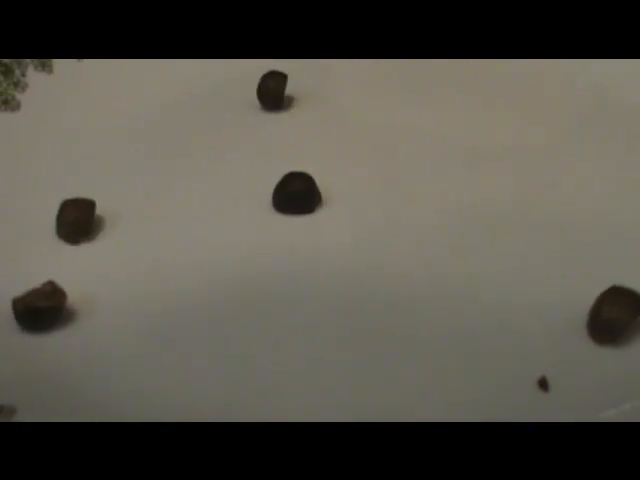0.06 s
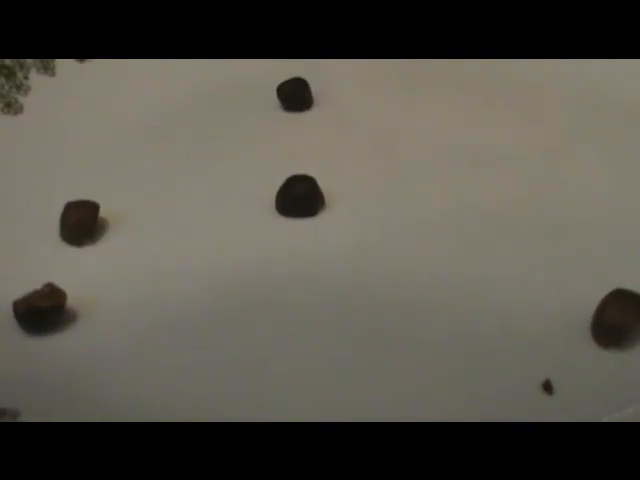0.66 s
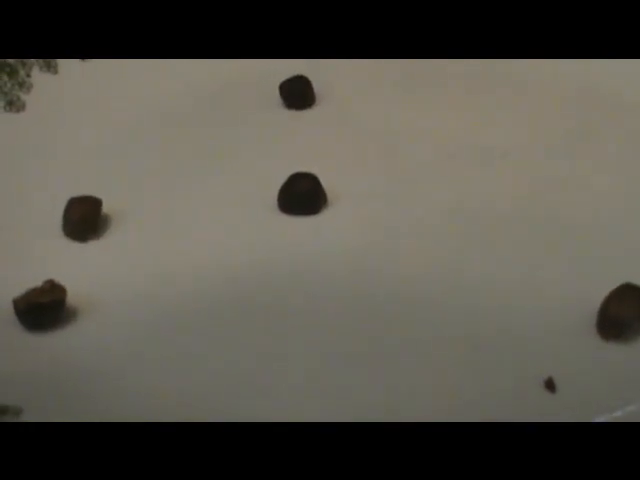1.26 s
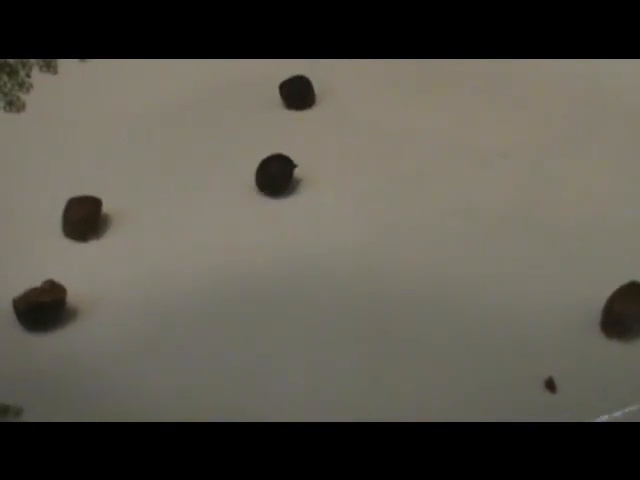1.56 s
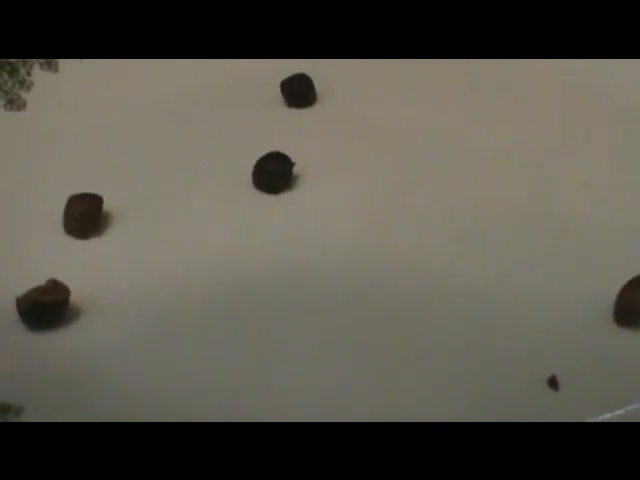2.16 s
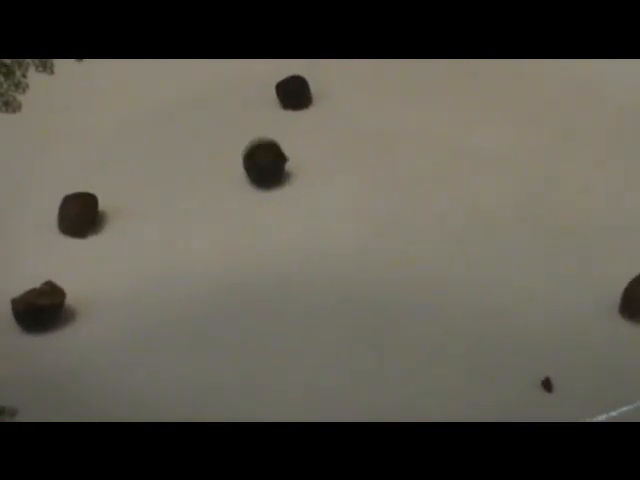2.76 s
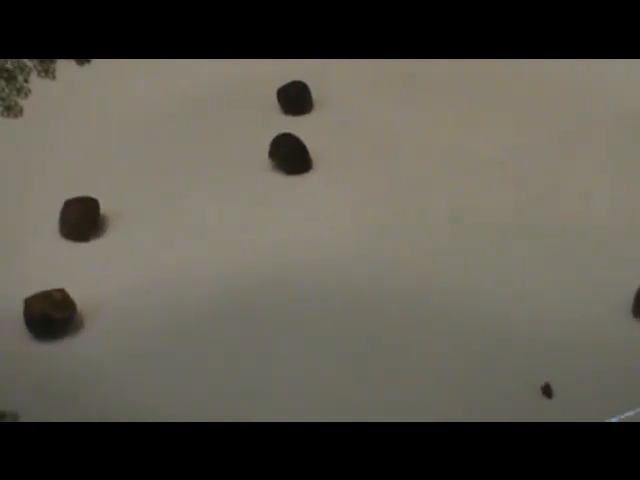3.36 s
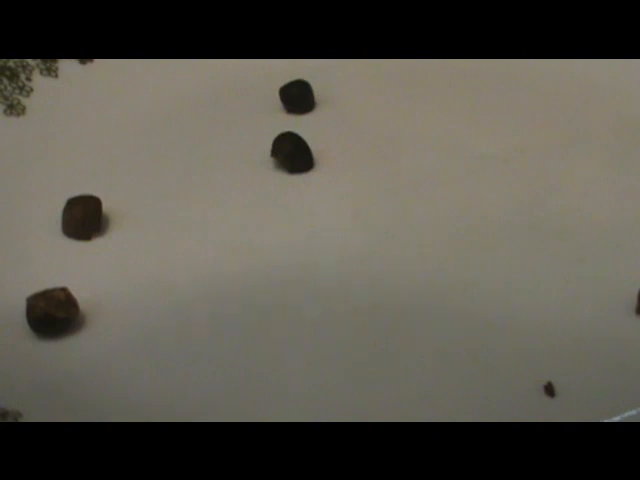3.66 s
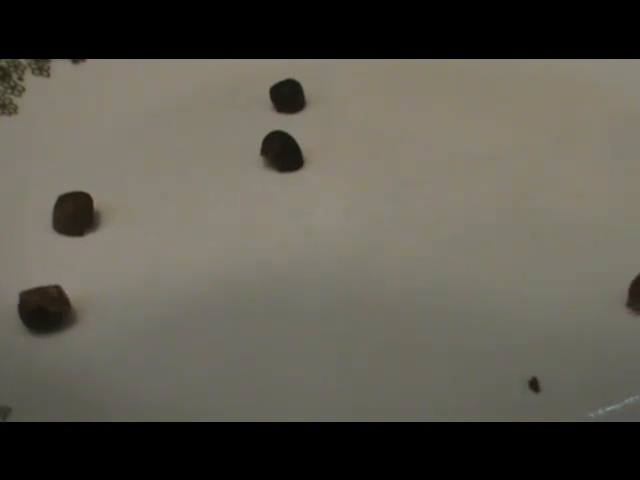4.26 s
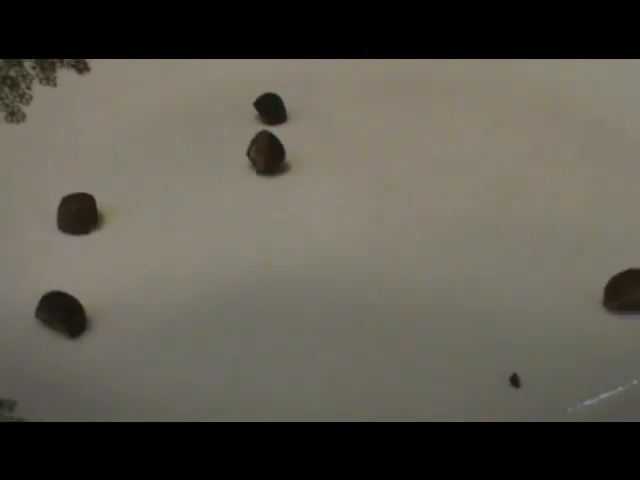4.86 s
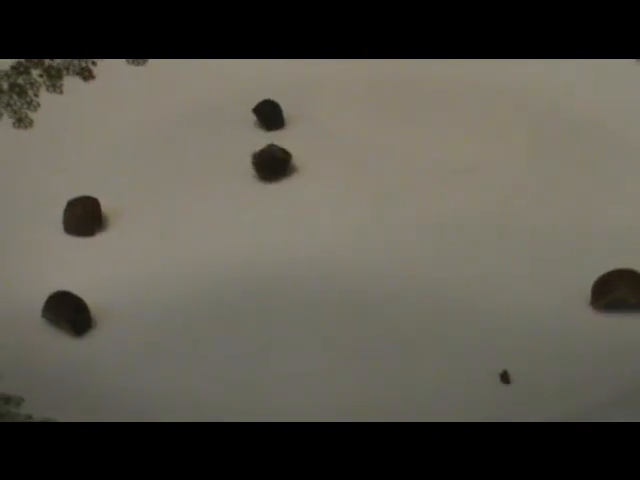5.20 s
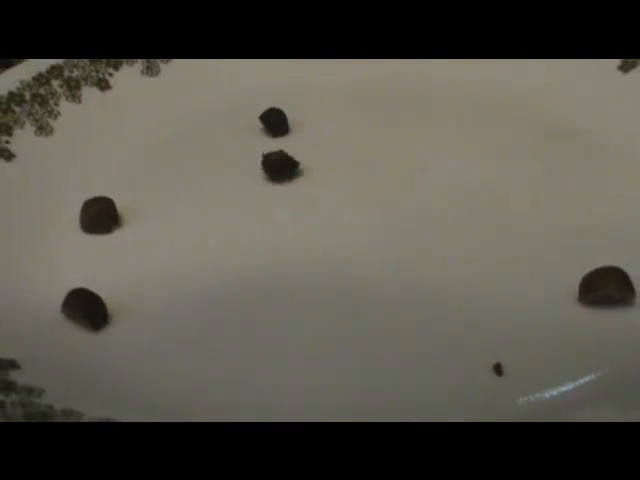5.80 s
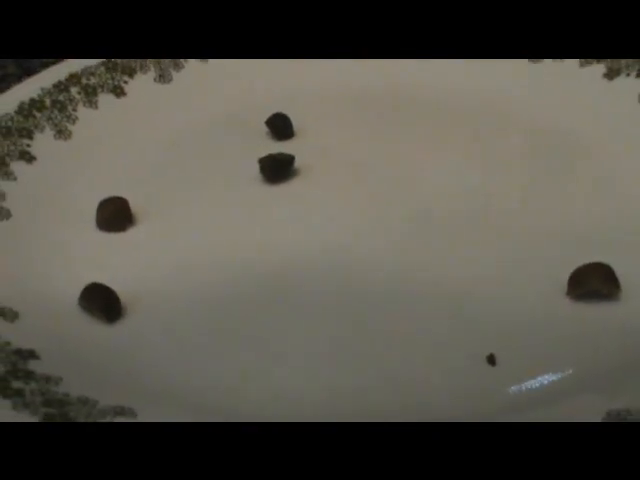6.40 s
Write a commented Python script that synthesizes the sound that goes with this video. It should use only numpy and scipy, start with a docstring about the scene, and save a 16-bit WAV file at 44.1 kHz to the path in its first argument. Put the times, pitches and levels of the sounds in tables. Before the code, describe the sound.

Small hard beans twitch on a ceramic dish, making sharp, irregular clicks and light rocking ticks in a quiet room.

```python
"""Jumping beans twitch on a ceramic dish, close by, over a quiet room's rumble and hiss.
First a small bean flips and wobbles. Then shells scuff, beans jerk, a heavy one tumbles, and the
table gets two soft bumps. Near 4.7 seconds one bean leaps, lands hard and rocks itself to rest,
while a bean briefly slides. Every touch rings the same tones of the dish, in a mix set by the
spot that is touched."""
import sys
import numpy as np
from scipy import signal
from scipy.fft import rfft, irfft
from scipy.io import wavfile

SR = 44100
rng = np.random.default_rng(int(sys.argv[2]) if len(sys.argv) > 2 else 0)


def materialize(psi):
    """Save the field psi as 16-bit PCM at rate SR to the path in sys.argv[1].

    A 1-D psi becomes a single channel; in a 2-D psi each row is a channel.
    """
    bounded = np.clip(np.atleast_2d(psi).T, -1, 1)
    quanta = np.round(bounded * 32767).astype(np.int16)
    wavfile.write(sys.argv[1], SR, quanta)


N = 292824
TIME = np.arange(N) / SR
RING_TIME = TIME[:SR // 4]

# The room's four noises. Each row: frequency in Hz, strength there in dB.
RUMBLE_COLOUR = [(12, -47), (25, -31), (50, -7), (66, 3), (80, 2.5), (110, 3.5), (150, -33)]
DRONE_COLOUR = [(95, -11), (125, -0.5), (158, 0.5), (195, -8), (260, -11.5), (400, -32.5)]
AIR_COLOUR = [(150, -9), (260, -1), (450, -0.5), (800, -2), (1100, -7), (1600, -10.5), (3000, -35)]
HISS_COLOUR = [(700, -9), (1300, 4.5), (2000, 7), (4000, 3.5), (7000, 1.5), (10000, 2.5), (13000, -4.5)]
# How three of them swell and sink. Each row: time in seconds, relative level in dB.
RUMBLE_SWELL = [(0.0, -69), (0.53, -74.5), (0.77, -64.5), (1.44, -72.5), (5.25, -65), (5.58, -71.5),
                (5.71, -66.5), (6.55, -65.5)]
DRONE_SWELL = [(0.0, -65.5), (1.09, -68), (1.9, -64), (6.38, -68), (6.55, -64.5)]
AIR_SWELL = [(0.0, -75.5), (1.75, -75.5), (4.89, -72), (6.55, -73.5)]
# How alike the room is on left and right. Each row: frequency in Hz, likeness (1 is the same).
ROOM_LIKENESS = [(60, 0.99), (130, 0.99), (220, 0.89), (350, .25), (700, 0.024), (2000, 0.014),
                 (6000, 0.61), (12000, 0.9)]

# The tones of the dish. Each row: pitch in Hz, ring time in seconds (t60, the time to fade by 60 dB),
# then relative strength in dB at the spots where beans jerk, flip, tumble, leap, rock and scuff.
DISH_TONES = [(1245, 0.03, -36, -29, -19, -36, -19, -35), (1500, 0.02, -34, -27, -22, -34, -18, -32),
              (2150, 0.04, -20, -14, -19, -37, -11, -28), (2230, 0.04, -18, -14, -18, -38, -11, -26),
              (3025, 0.09, -47, -33, -49, -35, -35, -36), (3600, 0.055, -20, -11, -14, -24, -15, -7),
              (3720, 0.025, -22, -15, -14, -22, -19, -8), (4175, 0.068, -8, -12, -9, -13, -10, -10),
              (4808, 0.08, -13, -20, -15, -10, -6, -12), (5453, 0.072, -9, -22, -14, -14, -14, -11),
              (5570, 0.06, -17, -15, -17, -14, -17, -11), (6092, 0.09, -19, -21, -16, -17, -16, -15),
              (7047, 0.072, -9, -9, -6, -22, -6, -12), (7470, 0.075, -14, -6, -14, -14, -24, -13),
              (7560, 0.085, -14, -9, -21, -10, -24, -16), (8731, 0.085, -14, -24, -11, -15, -15, -19),
              (9082, 0.09, -17, -23, -18, -21, -21, -16), (9561, 0.1, -23, -27, -33, -23, -28, -23),
              (10018, 0.08, -15, -16, -20, -28, -34, -19), (10788, 0.08, -5, -22, -9, -5, -14, -8),
              (11045, 0.07, -16, -12, -13, -6, -28, -9), (11146, 0.075, -13, -15, -11, -14, -17, -13),
              (11846, 0.08, -20, -23, -24, -15, -33, -18), (11955, 0.08, -31, -14, -18, -22, -33, -17),
              (12380, 0.06, -25, -29, -26, -34, -32, -23)]
JERK_SPOT, FLIP_SPOT, TUMBLE_SPOT, LEAP_SPOT, ROCK_SPOT, SCUFF_SPOT = np.transpose(DISH_TONES)[2:]
# A shell's dry crack, a hard blow's snap and the friction of shell on glaze.
# Each row: frequency in Hz, strength there in dB.
CRACK_COLOUR = [(500, -46), (1300, -24), (2800, -13), (3800, -10), (5500, -1.5), (8000, 0), (10000, -1),
                (12400, -1.5), (13300, -41), (15500, -36)]
SNAP_COLOUR = [(2000, -14), (5000, 11), (13000, 11), (14500, -21), (16000, -31)]
FRICTION_COLOUR = [(500, -26), (1200, 1), (2800, 3.5), (3600, 0), (5000, 4), (7000, 10.5), (11000, 6),
                   (12600, 6), (13400, -25)]

# Beans flip, scuff and tumble.
# Each row: start in seconds, level in dB, brightness in dB per octave, number of touches.
FLIP_HITS = [(0.0736, -47, -12, 1), (0.1438, -52, -4, 1), (0.1582, -34.5, 2.5, 1), (0.2175, -40, -4, 3),
             (4.6457, -47.5, 1, 1), (4.664, -46.5, -10, 1), (4.6821, -42, -23, 1), (4.6902, -38, 0, 1)]
SCUFF_HITS = [(0.5313, -48.5, -16, 1), (0.55, -40.5, 1.5, 1), (0.629, -63, -6, 1), (0.667, -61, -5, 1),
              (0.767, -61.5, 16, 1), (1.1474, -40, -4.5, 1), (1.5267, -50, -4, 1), (1.5349, -41, 1, 1),
              (1.7899, -42, 4, 1), (2.325, -41.5, -4, 1), (3.0625, -46.5, -3, 2), (3.143, -59.5, -7, 1),
              (3.7858, -45, 2.5, 3), (4.7184, -48, -37, 1), (6.4861, -46, 1, 3)]
TUMBLE_HITS = [(1.5606, -41, -9, 1), (1.5805, -47, 10, 1), (1.6036, -30.5, -3, 6), (2.8116, -39, 7.5, 1),
               (2.8374, -39, -2, 3), (2.904, -31, 2.5, 1), (2.91, -31.5, -3.5, 1), (2.9426, -31, 3.5, 1),
               (2.989, -35.5, 0.5, 1)]
# A bean wobbles. Each row: start in seconds, length in seconds, starting level in dB.
WOBBLE_SPELLS = [(0.135, 0.12, -68), (1.615, 0.92, -71.5), (2.798, 0.24, -69), (4.655, 0.345, -67.5),
                 (5.003, 1.48, -68.5)]
# The tones a wobble stirs. Each row: pitch in Hz, width in Hz, relative strength in dB.
WOBBLE_TONES = [(2166, 180, -14), (4070, 39, -18.5), (4890, 110, -24)]
# Beans jerk and leap. Each row: start in seconds, level in dB, brightness in dB per octave.
JERK_HITS = [(1.1031, -31.5, 1), (1.379, -58, -9), (2.1646, -28.5, -0.5), (2.7664, -30.5, -2.5),
             (3.4241, -28, -1), (4.0614, -56, -8), (4.209, -30.5, 4)]
LEAP_HITS = [(4.7267, -45, -3), (4.7387, -23.5, -0.5), (4.7607, -40, 1), (4.7776, -35, 1), (4.782, -47, 23)]
# Soft bumps on the table. Each row: start in seconds, level in dB.
TABLE_BUMPS = [(3.05, -61.5), (4.252, -49)]
# The tones of the table top. Each row: pitch in Hz, ring time in seconds, relative strength in dB.
TABLE_TONES = [(236, 0.083, 6), (291, 0.15, 3), (370, .1, -5), (460, 0.17, 0.5), (506, 0.13, -1)]
# A bean lurches on its uneven back. Each row: start in seconds, level in dB, number of touches.
LURCH_HITS = [(4.8073, -39, 1), (4.8418, -38.5, 1), (4.8576, -36, 1), (4.886, -41, 1), (4.9062, -41.5, 1),
              (4.9335, -42, 1), (4.9651, -43, 1), (5.0055, -48.5, 3), (5.089, -43.5, 1), (5.1612, -49.5, 1),
              (5.246, -49, 3), (5.3254, -39.5, 1), (5.3487, -49.5, 2), (5.472, -48, 1), (5.5363, -44, 1),
              (5.6652, -44, 1), (5.7162, -42.5, 1), (6.4038, -58.5, 2)]
# Harder rocking sounds brighter. Each row: level in dB, brightness in dB per octave.
BRIGHTNESS_BY_LEVEL = [(-55, -2), (-39.5, 4)]


def from_db(db):
    """Turn decibels into a number to multiply a sound by."""
    return 10 ** (np.asarray(db) / 20)


def rms_one(x):
    """Scale a sound so that its average level (rms) is 1."""
    return x / np.sqrt(np.mean(x ** 2) + 1e-20)


def fade(t, t60):
    """A ring that loses 60 dB in t60 seconds."""
    return np.exp(-np.log(1000) * t / np.maximum(t60, 1e-3))


def held(start_s, length_s, edge_s):
    """A level that rises, holds, and falls once its length is over."""
    return np.clip(np.minimum(TIME - start_s, start_s + length_s + edge_s - TIME) / edge_s, 0, 1)


def at_hz(points, hz):
    """Read a smooth curve through a table's rows at any frequency."""
    known_hz, values = np.transpose(points)
    return np.interp(np.log(hz + 1), np.log(known_hz), values)


def stereo_noise(colour, likeness):
    """Steady noise of a given colour; likeness (a number or table) makes left and right alike."""
    hz = np.arange(N // 2 + 1) * SR / N
    alike = np.clip(at_hz(likeness, hz) if np.ndim(likeness) else likeness, -1, 1)
    mid, side = rfft(rng.standard_normal((2, N)))
    pair = np.sqrt(1 + alike) * mid + np.sqrt(1 - alike) * side * [[1], [-1]]
    return rms_one(irfft(pair * from_db(at_hz(colour, hz)), N))


def resonate(x, hz, width_hz):
    """Let a sound ring one tone; a narrower tone rings longer."""
    r = np.exp(-np.pi * width_hz / SR)
    feedback = [1, -2 * r * np.cos(2 * np.pi * hz / SR), r * r]
    return signal.lfilter(np.array([1, 0, -1]) * (1 - r * r) / 2, feedback, x + 1e-18)


def low_pass(x, hz):
    """Steeply cut away everything above hz."""
    return signal.sosfilt(signal.ellip(12, .1, 70, hz, fs=SR, output="sos"), x)


def grains(per_s):
    """Tiny touches of random size at random moments."""
    return (rng.random(N) < per_s / SR) * rng.standard_normal(N)


def background():
    """Distant rumble, a low drone and a rush of air swell slowly under a steady hiss."""
    layers = [(RUMBLE_COLOUR, RUMBLE_SWELL, 2.0), (DRONE_COLOUR, DRONE_SWELL, 2.5),
              (AIR_COLOUR, AIR_SWELL, 7.5)]
    out = np.zeros((2, N))
    for colour, swell, gain_db in layers:
        level_db = np.interp(TIME, *np.transpose(swell)) + gain_db
        out += from_db(level_db) * stereo_noise(colour, ROOM_LIKENESS)
    return out + from_db(-67) * stereo_noise(HISS_COLOUR, ROOM_LIKENESS)


def chatter(hits, gap_s, loss_db):
    """Each landing becomes its number of touches, evenly spaced and weaker every time."""
    return [(s + k * gap_s, level_db - k * loss_db, bright)
            for s, level_db, bright, touches in hits for k in range(int(round(touches)))]


def taps(hits, spot_db, crack_db, crack_t60, ring_scale, pan_db, rise_s):
    """Each touch cracks dryly and rings the dish; a brighter touch favours the high tones."""
    hz, t60 = np.transpose(DISH_TONES)[:2]
    tones = np.exp(2j * np.pi * hz[:, None] * RING_TIME) * fade(RING_TIME, ring_scale * t60[:, None])
    octaves = np.clip(np.log2(hz / 7000), -.7, .6)
    tilt_db = np.array(hits)[:, 2:] * octaves
    # each tone reaches left and right slightly out of step
    stereo_shift = np.exp(1j * rng.normal(0, 0.05, (2, 1, len(hz))))
    # no two touches land on quite the same point
    scatter_db = 3.0 * rng.standard_normal(tilt_db.shape)
    strength = from_db(spot_db + tilt_db + scatter_db)
    strength /= np.sqrt(np.sum(strength ** 2, axis=1, keepdims=True) / 2)
    phases = np.exp(2j * np.pi * rng.random(strength.shape))
    rings = ((strength * phases * stereo_shift) @ tones).imag
    crack = from_db(crack_db) * stereo_noise(CRACK_COLOUR, likeness=0.76)
    attack = 1 - np.exp(-(RING_TIME / rise_s) ** 2)
    out = np.zeros((2, N))
    for k, (s, level_db, _) in enumerate(hits):
        start = int(s * SR)
        n = min(len(RING_TIME), N - start)
        tap = rings[:, k, :n] + crack[:, start:start + n] * fade(RING_TIME[:n], crack_t60)
        out[:, start:start + n] += from_db(level_db) * attack[:n] * tap
    return out * from_db([[pan_db / 2], [-pan_db / 2]])


def flips():
    """A small bean flips over and clicks on the dish."""
    return taps(chatter(FLIP_HITS, gap_s=0.019, loss_db=7.5), FLIP_SPOT,
                crack_db=-4.5, crack_t60=0.048, ring_scale=0.84, pan_db=-1.0, rise_s=0.00034)


def room_echo(x, t60, first_echo_s):
    """The room answers with a short wash of echoes, different on left and right."""
    t = TIME[:SR // 2]
    tail = rng.standard_normal((2, len(t))) * fade(t, t60) * (t > first_echo_s)
    tail /= np.sqrt(np.sum(tail ** 2, axis=1, keepdims=True))
    return signal.fftconvolve(x, tail, axes=1)[:, :N]


def wobble(loss_db_per_s):
    """A bean rolls on its round side, ever more weakly; many soft touches keep low tones murmuring."""
    roll = grains(per_s=510)
    level = sum(from_db(db - loss_db_per_s * (TIME - s)) * held(s, length_s, edge_s=0.026)
                for s, length_s, db in WOBBLE_SPELLS)
    murmur = sum(from_db(db) * resonate(roll, hz, width) for hz, width, db in WOBBLE_TONES)
    return level * rms_one(murmur)


def lighter_touches(hits, delay_s, gain_db, tilt_db):
    """A softer, duller touch beside each hit; tilt is per octave, and a negative delay comes first."""
    return [(s + delay_s, db + gain_db, bright + tilt_db) for s, db, bright, *_ in hits]


def rubbed_dish(spot_db):
    """The fine grains of a rubbing shell keep the dish ringing."""
    rub = grains(per_s=4000)
    return rms_one(sum(from_db(db) * resonate(rub, hz, width_hz=np.log(1000) / (np.pi * t60))
                       for (hz, t60, *_), db in zip(DISH_TONES, spot_db)))


def rubbing(hits, spot_db, rub_db, span_s):
    """A shell drags a little on the glaze just before and after each soft touch."""
    touches = np.zeros(N)
    for s, level_db, _ in hits:
        touches[int(s * SR)] = from_db(level_db + rub_db)
    swell = np.exp(-((RING_TIME - RING_TIME.mean()) / span_s) ** 2)
    return signal.fftconvolve(touches, swell, "same") * rubbed_dish(spot_db)


def scuffs():
    """A shell catches with a dull tick, then slips, taking a moment to set the dish ringing."""
    catches = lighter_touches(SCUFF_HITS, delay_s=-0.014, gain_db=-16, tilt_db=-3)
    hits = chatter(SCUFF_HITS, gap_s=0.0098, loss_db=1.0) + catches
    ticks = taps(hits, SCUFF_SPOT,
                 crack_db=-4, crack_t60=0.04, ring_scale=0.75, pan_db=-0.5, rise_s=0.0012)
    return ticks + rubbing(hits, SCUFF_SPOT, rub_db=-13.5, span_s=0.0088)


def jerks():
    """A bean stirs, jerks in place against the dish, and settles."""
    stirs = lighter_touches(JERK_HITS, delay_s=-0.028, gain_db=-20.5, tilt_db=-2)
    settles = lighter_touches(JERK_HITS, delay_s=0.02, gain_db=-14.5, tilt_db=-1.8)
    knocks = taps(JERK_HITS + stirs + settles, JERK_SPOT,
                  crack_db=-5.0, crack_t60=0.038, ring_scale=0.79, pan_db=-2.0, rise_s=0.00063)
    return knocks + rubbing(stirs, JERK_SPOT, rub_db=-11, span_s=0.017)


def snaps(hits, full_db, t60):
    """A blow starts with a very short, bright snap that grows with the square of its force."""
    level = np.zeros(N)
    for s, level_db, _ in hits:
        start = int(s * SR)
        level[start:start + len(RING_TIME)] += from_db(2 * level_db - full_db) * fade(RING_TIME, t60)
    return level * stereo_noise(SNAP_COLOUR, likeness=0.53)


def tumbles():
    """A heavy bean tips onto another face and may chatter there."""
    return taps(chatter(TUMBLE_HITS, gap_s=0.0111, loss_db=3.0), TUMBLE_SPOT,
                crack_db=-7.5, crack_t60=0.031, ring_scale=0.68, pan_db=-1.3, rise_s=0.001)


def bumps(rise_s):
    """Dull knocks swell and die in the table top."""
    out = np.zeros(N)
    for s, level_db in TABLE_BUMPS:
        t = np.maximum(TIME - s, 0)
        ring = sum(from_db(db) * np.sin(2 * np.pi * hz * t) * fade(t, t60)
                   for hz, t60, db in TABLE_TONES)
        out += from_db(level_db) * (1 - np.exp(-t / rise_s)) * ring
    return out


def leap():
    """A bean leaps and lands hard on the dish."""
    return taps(LEAP_HITS, LEAP_SPOT,
                crack_db=-6, crack_t60=0.038, ring_scale=0.88, pan_db=-1.0, rise_s=0.0009)


def rocking(swing_count, tick_count):
    """A bean lurches, then sways, each swing shorter and softer; light ticks fall in between."""
    def bright(level_db):
        return np.interp(level_db, *np.transpose(BRIGHTNESS_BY_LEVEL))

    landings = [(s, db, bright(db), touches) for s, db, touches in LURCH_HITS]
    lurches = chatter(landings, gap_s=0.012, loss_db=1.3)
    swings = []
    swing_s, gap_s, shrink = 5.8879, 0.1105, 0.96
    for k in range(swing_count):
        db = -48.5 - 0.4 * k
        swings.append((swing_s, db, bright(db)))
        swing_s += gap_s * shrink ** k
    # a ridge of the shell touches ahead of each swing
    ridges = lighter_touches(swings, delay_s=-0.042, gain_db=-7, tilt_db=-1.8)
    from_s, to_s = 5.02, 6.45
    tick_s = from_s + (to_s - from_s) * (np.arange(tick_count) + rng.random(tick_count)) / tick_count
    tick_db = rng.normal(-57.5, 0.5, tick_count)
    hits = lurches + swings + ridges + list(zip(tick_s, tick_db, bright(tick_db)))
    knocks = taps(hits, ROCK_SPOT,
                  crack_db=-17.0, crack_t60=0.034, ring_scale=0.8, pan_db=-1.5, rise_s=0.00045)
    return knocks + rubbing(hits, ROCK_SPOT, rub_db=-16, span_s=0.015)


def slide(surge_s, ring_db):
    """A bean slides with one brief surge of speed; friction hisses and rings the dish."""
    glide = held(start_s=5.38, length_s=0.31, edge_s=0.05)
    surge = fade(np.abs(TIME - surge_s), t60=np.where(TIME < surge_s, 0.15, 0.098))
    speed = from_db(-63.5) * glide + from_db(-47.5) * surge
    friction = stereo_noise(FRICTION_COLOUR, likeness=0.75)
    return speed * (friction + from_db(ring_db) * rubbed_dish(SCUFF_SPOT))


def scene():
    """Add up the room, the beans on their dish and the table."""
    top_hz = 13100  # only the snaps of hard blows reach higher
    room = low_pass(background(), top_hz)
    beans = (flips() + wobble(loss_db_per_s=4) + scuffs() + jerks() + tumbles() + leap()
             + rocking(swing_count=4, tick_count=20) + slide(surge_s=5.57, ring_db=-5))
    dish = low_pass(beans, top_hz)
    echo = from_db(-12) * room_echo(dish, t60=0.22, first_echo_s=0.0072)
    snap = snaps(JERK_HITS, full_db=-24.5, t60=0.024) + snaps(LEAP_HITS, full_db=-15.5, t60=0.029)
    return room + dish + echo + snap + bumps(rise_s=0.021)


def record(dry):
    """The very highest treble is cut steeply."""
    return low_pass(dry, hz=15900)


dry = scene()
out = record(dry)
materialize(out)
```